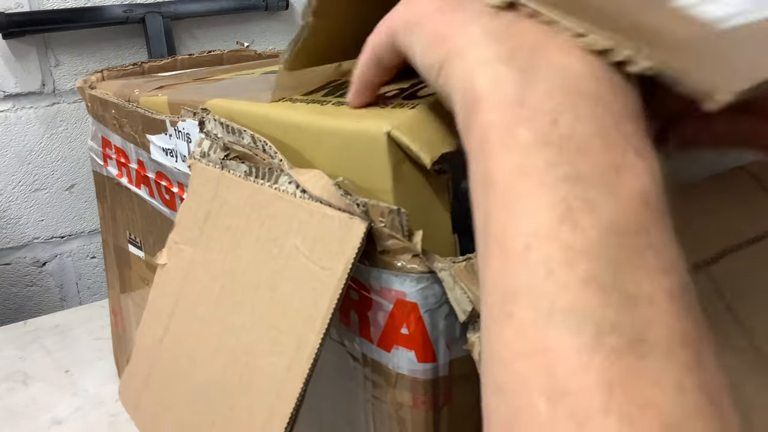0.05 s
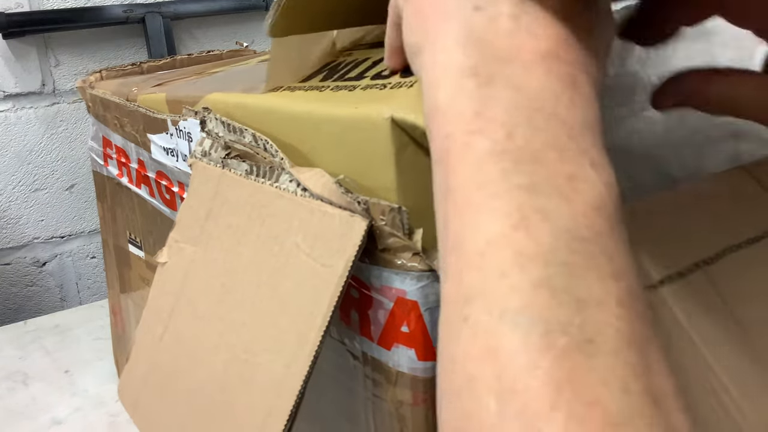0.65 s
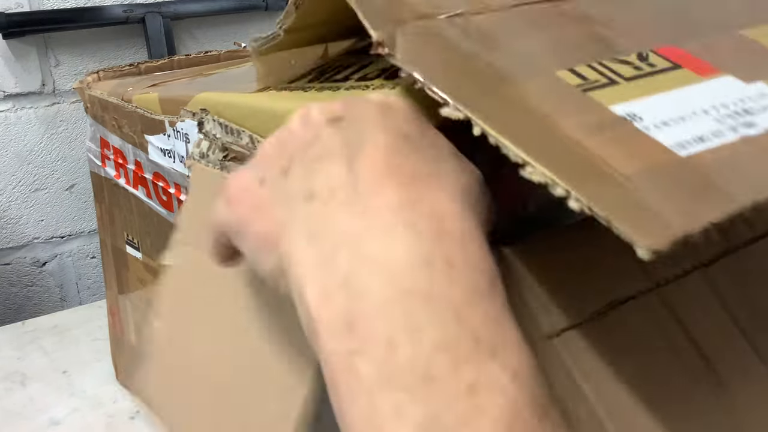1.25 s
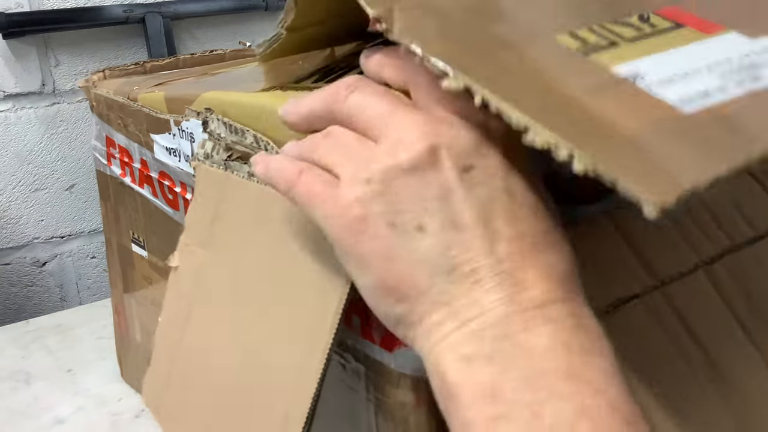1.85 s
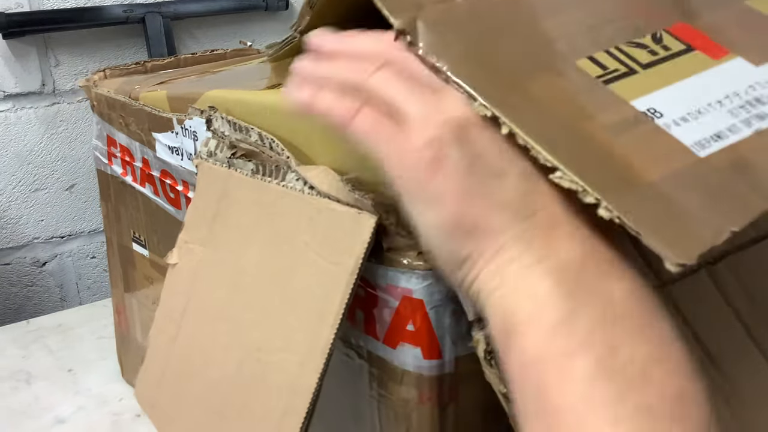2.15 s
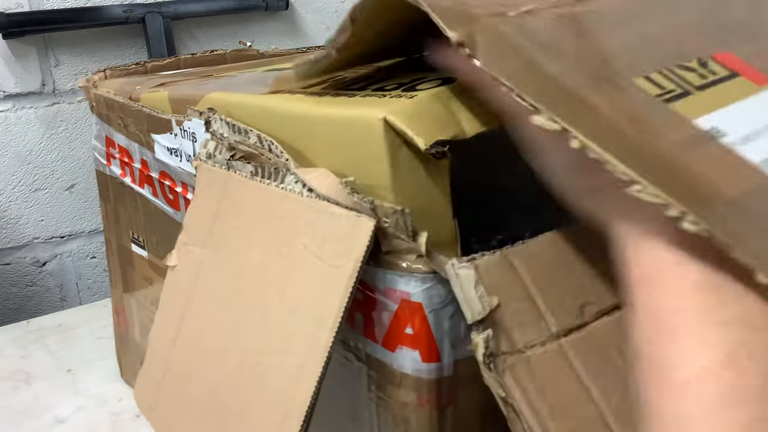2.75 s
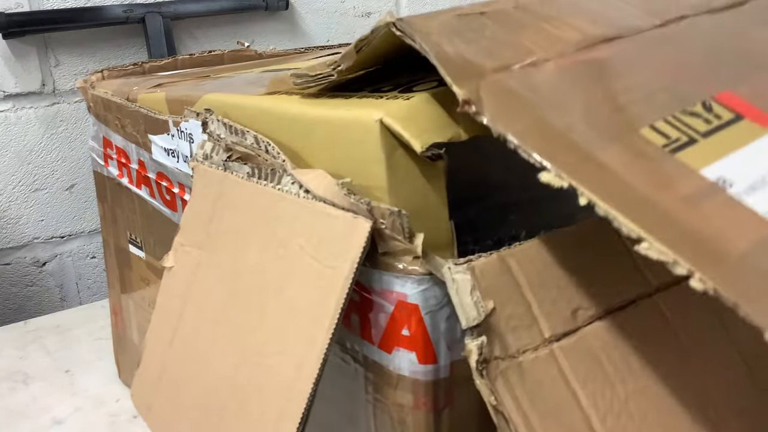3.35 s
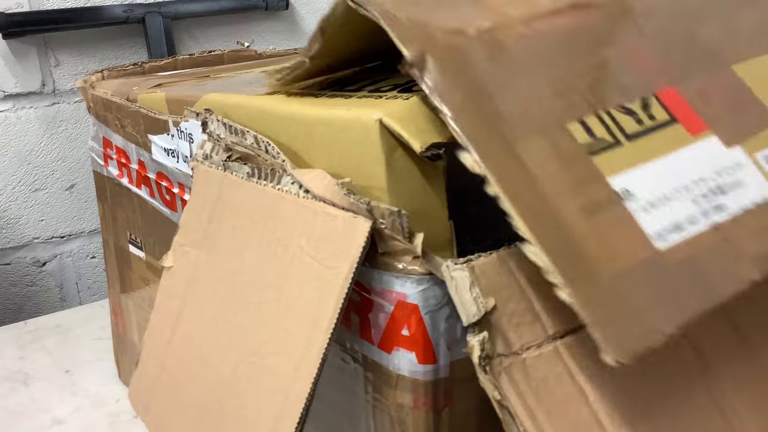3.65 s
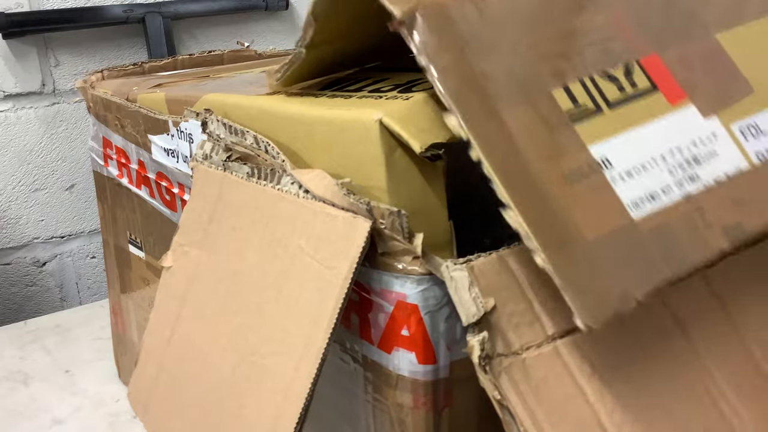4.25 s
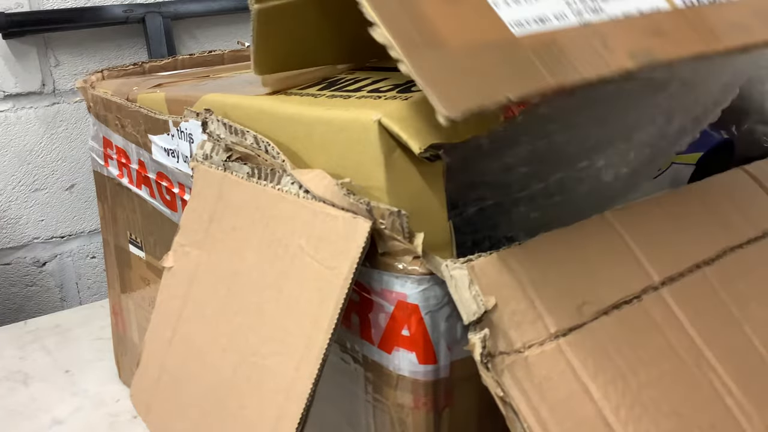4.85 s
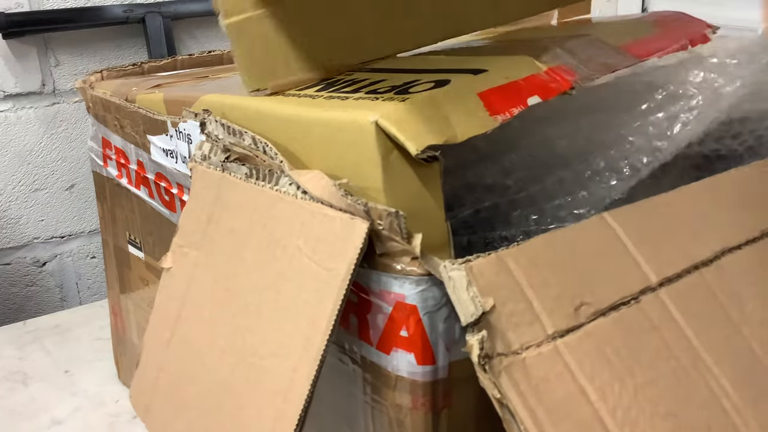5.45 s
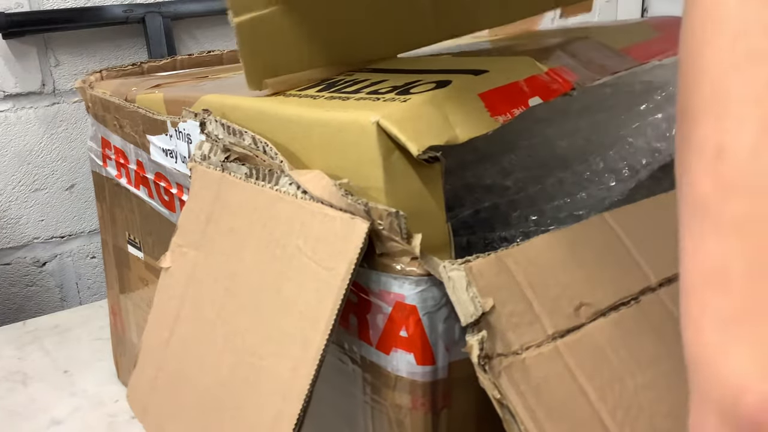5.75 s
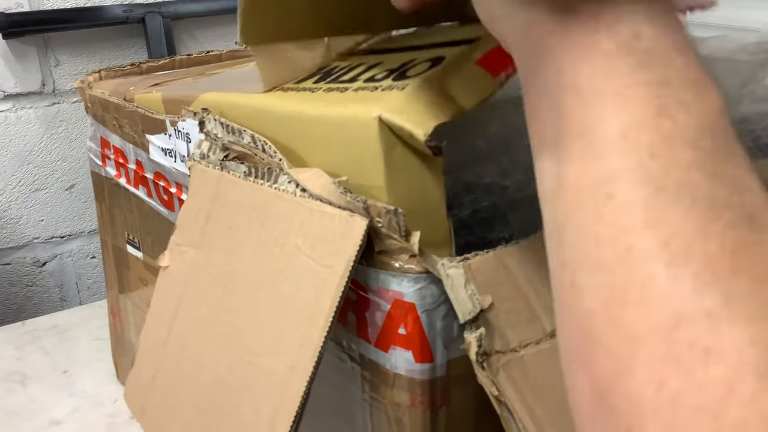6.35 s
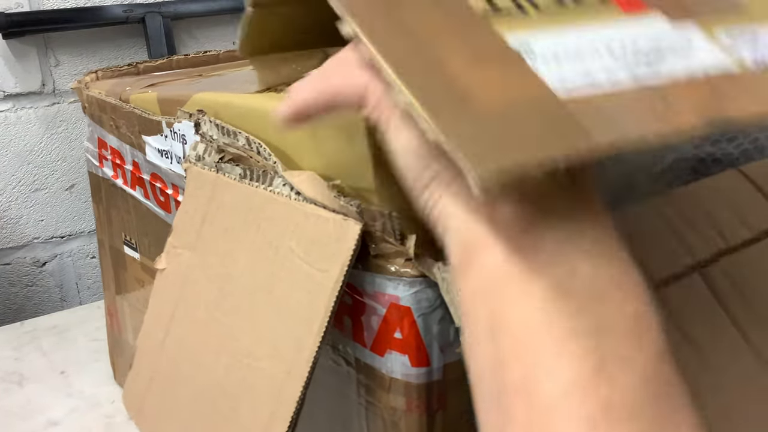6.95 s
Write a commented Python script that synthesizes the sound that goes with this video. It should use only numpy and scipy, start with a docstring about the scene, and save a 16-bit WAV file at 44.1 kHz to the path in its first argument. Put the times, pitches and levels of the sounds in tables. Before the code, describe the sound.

A sharp snap opens the sound, close by in a small room, as hands work on a big cardboard box. Bubble wrap rustles in uneven strokes with a fine, bright hiss and crinkle, while cardboard slides and bends with a soft, low rumble. Tape and creases snap near 1 second and again around 1.5 seconds. A hollow thud comes at 2 seconds, followed by smaller knocks and scraping until about 2.7 seconds. The handling turns quieter, then just before 4 seconds a flap briefly judders over an edge. A few clicks come near 5 seconds and the rustling swells. At about 5.5 seconds a flap tears free in a quick burst of cracks, the loudest moment, with another sharp snap just after. Rummaging continues with crinkles, short scrapes and snaps until about 7 seconds, over a faint, steady background rush.

```python
"""A sharp snap and a rustle of bubble wrap, close by in a small room: hands are opening a big cardboard box.
The wrap rustles as countless tiny creases buckle, board slides on board, and the panels bend and thud.
Tape and creases snap, and near 4 s a flap judders past an edge.
At about 5.5 s one flap tears free in a loud burst of cracks, then the rummaging goes on."""
import sys
import numpy as np
from scipy import signal
from scipy.io import wavfile

SR = 44100
rng = np.random.default_rng(int(sys.argv[2]) if len(sys.argv) > 2 else 0)


def wrap_up_sound(samples):
    """Save the sound to the file named by the first command line argument, as 16-bit audio."""
    columns = np.atleast_2d(samples).T
    # keep every value between -1 and 1, then stretch to whole-number steps
    tamed = np.clip(columns, -1, 1)
    steps = np.round(tamed * 32767).astype(np.int16)
    wavfile.write(sys.argv[1], SR, steps)


N = 313021
TIME = np.arange(N) / SR
FLEXING, RUBBING, RUSTLING = range(3)  # the three layers that the hands drive


# Tone of sliding plastic film: f/Hz, level/dB (levels in all tables are relative)
FILM_TONE = [(700, -31), (1800, -12), (3000, -13), (4800, -5), (5800, -2), (7200, -6), (8300, -8),
             (9800, -16), (12000, -18), (16000, -31)]

def bubble_wrap(hiss_db=-2, crinkle_db=-6, clump_db=2.08):
    """Film slides with a fine hiss; small creases buckle in clumps, the big low ones more softly."""
    sliding = grains(9000, 1.8) * gain_of(clump_db * wander(90))
    hiss = unit_rms(colour(sliding, FILM_TONE))
    clumps = gain_of(3.5 * wander(25))
    crinkle = np.zeros(N)
    for hz in np.geomspace(2000, 7200, 9):
        buckles = grains(50, 3.9) * clumps
        crinkle += np.sqrt(hz) * colour(buckles, hump(hz, 0.11, skirt_db=-14))
    return hand_effort(RUSTLING) * (gain_of(hiss_db) * hiss + gain_of(crinkle_db) * unit_rms(crinkle))


# Strokes of the hands: start t/s, length/s, flexing level/dB, rubbing level/dB, rustling level/dB
HAND_STROKES = [(-0.05, 0.097, -42.5, -42, -33), (0.07, 0.19, -52.5, -50, -45.5),
                (0.29, 0.13, -51.5, -50.5, -43.5), (0.48, 0.11, -48.5, -50.5, -42),
                (0.708, 0.049, -49.5, -51.5, -51.5), (0.815, 0.19, -48, -48.5, -43.5),
                (1.11, 0.19, -53.5, -52, -41.5), (1.291, 0.14, -50.5, -41.5, -42),
                (1.44, 0.24, -56.5, -45.5, -44.5), (1.699, 0.42, -50, -40.5, -43),
                (2.11, 0.21, -47, -45.5, -45), (2.288, 0.38, -45, -37.5, -39),
                (2.675, 0.16, -54, -51.5, -38), (2.857, 0.13, -50.5, -46.5, -45.5),
                (3.112, 0.49, -60.5, -54.5, -45), (3.343, 0.085, -56, -51.5, -54),
                (3.95, 0.17, -59, -53, -59), (4.243, 0.12, -56, -50, -48), (4.314, 0.17, -50, -43.5, -44.5),
                (4.583, 0.26, -56, -51, -44.5), (5.095, 0.18, -51.5, -49.5, -37.5),
                (5.286, 0.32, -53, -41.5, -36), (5.67, 0.062, -58, -66, -42),
                (5.911, 0.14, -57, -52, -40.5), (6.142, 0.07, -46.5, -50.5, -45),
                (6.3, 0.058, -55, -46, -41), (6.423, 0.12, -54.5, -52, -44),
                (6.577, 0.085, -58, -54, -45.5), (6.747, 0.29, -57.5, -50.5, -44.5),
                (7.038, 0.06, -57, -49, -40)]
# The faint stir that goes on between strokes: level/dB for flexing, rubbing, rustling
RESTING_DB = [-64, -56.5, -48]

def hand_effort(layer, attack_s=0.026, release_s=0.054, swell_db_per_s=4):
    """How hard the hands drive one layer: each stroke speeds up, presses a little harder, then fades."""
    power = np.full(N, gain_of(RESTING_DB[layer]) ** 2)
    for start, length, *levels_db in HAND_STROKES:
        t = np.arange(0, length + 10 * release_s, 1 / SR)
        shape = np.minimum(t / attack_s, 1) * np.exp(-np.maximum(t - length, 0) / release_s)
        stroke = shape * gain_of(levels_db[layer] + swell_db_per_s * (t - length / 2))
        add(power, start, stroke[start + t >= 0] ** 2)
    return np.sqrt(power)


# Creases, tape and film buckling: t/s, level/dB over 2 ms, centre f/Hz
BUCKLE_SNAPS = [(0.0035, -21, 5250), (0.1477, -29, 6350), (0.318, -28, 6230), (0.3881, -28, 5800),
                (0.5085, -33, 1300), (0.615, -29, 5270), (0.8353, -28, 4770), (0.9601, -18.5, 5450),
                (1.4834, -24, 5360), (1.5458, -23, 6000), (1.6229, -28.5, 5900), (2.0262, -30.5, 5900),
                (2.6813, -26, 3260), (4.8188, -30, 4060), (4.9469, -28.5, 6100), (5.0309, -35, 3400),
                (5.421, -21.5, 3650), (5.4404, -16, 5900), (5.4627, -21, 4600), (5.7073, -38, 5900),
                (5.7117, -16, 5600), (5.7178, -24.5, 5750), (5.9408, -35.5, 1600), (6.179, -31, 5100),
                (6.1855, -32, 2210), (6.1927, -29.5, 5700), (6.2237, -28.5, 5270), (6.2423, -35.5, 3000),
                (6.3636, -24.5, 5940), (6.439, -35, 2940), (6.6013, -31.5, 5800), (6.9324, -25.5, 6700),
                (7.0736, -26, 3240)]

def snaps(level_db=0.3, buckle_s=0.00031, tick_db=-10, samples=512):
    """A crease flips with a tick, then the patch around it chatters: longer if big, woody if low."""
    out, t = np.zeros(N), np.arange(samples) / SR
    for start, db, hz in BUCKLE_SNAPS + tearing_flap() + small_creases():
        size = 2 ** ((db + 30) / 20)
        chatter = rng.choice([-1, 1], samples) * t * np.exp(-t / (buckle_s * size))
        patch_tone = hump(hz, 0.24 * np.sqrt(6000 / hz), skirt_db=-12, dull_hz=3100)
        click = colour(chatter, patch_tone)
        click /= np.linalg.norm(click)
        click[0] += gain_of(tick_db) / size
        add(out, start, gain_of(db + level_db) * click * np.sqrt(0.002 * SR))
    return out


def tearing_flap(start_s=5.5225, gap_s=0.0105, gap_ratio=0.87, top_db=-12, fall_db_per_s=270, count=7):
    """Lists the snaps of a tear: ever faster, and loudest just before the last fibres part."""
    gaps = gap_s * gap_ratio ** np.arange(count - 1)
    times = start_s + np.append(0, np.cumsum(gaps))
    return [(t, top_db - fall_db_per_s * abs(t - times[-3]), 5900) for t in times]


def small_creases(over_db=4, spread_db=3, low_hz=1700, high_hz=6500, count=48):
    """Lists small snaps of random time and pitch, louder when the wrap is worked harder."""
    rustle_db = 20 * np.log10(hand_effort(RUSTLING))
    when, size, pitch = rng.random((count, 3)).T
    at = (when * N).astype(int)
    levels_db = rustle_db[at] + over_db + spread_db * (2 * size - 1)
    return list(zip(TIME[at], levels_db, low_hz * (high_hz / low_hz) ** pitch))


# Tone of board sliding on board: f/Hz, level/dB
RUB_TONE = [(120, -22), (280, -6), (480, -2.5), (620, 0.5), (800, -3), (1200, -5.5), (2000, -13),
            (16000, -43)]
# How much a raw edge rasps: t/s, level/dB compared with the flat face
EDGE_RASP = [(0, -1.5), (1.0, -24), (1.4, -5.5), (2.3, -6.5), (2.6, -3), (3.4, 5), (4.4, 0), (5.3, 4.5),
             (5.9, -9), (6.8, 1)]

def board_rubbing(catch_db=2, rasp_hz=2400):
    """Fibres catch and let go as board slides on board; a raw edge adds a coarser, brighter rasp."""
    catching = gain_of(catch_db * wander(70))
    face = unit_rms(colour(grains(3000, 4.1) * catching, RUB_TONE))
    edge = unit_rms(colour(grains(1200, 2.4) * catching, hump(rasp_hz, 0.88, skirt_db=-35)))
    edge_gain = gain_of(np.interp(TIME, *np.transpose(EDGE_RASP)))
    return hand_effort(RUBBING) * (face + edge_gain * edge)


# Tone of the bending panels: f/Hz, level/dB
PANEL_TONE = [(25, -13), (45, -11.5), (80, -2), (105, -9), (155, -4.5), (280, -4), (450, -12.5), (900, -47)]

def panel_rumble(uneven_db=1):
    """Uneven pushes make the big panels and the air in the box rumble."""
    pushes = grains(1500, 2.5) * gain_of(uneven_db * wander(35))
    return hand_effort(FLEXING) * unit_rms(colour(pushes, PANEL_TONE))


# Blows on the panels: t/s, level/dB, centre f/Hz, spread/octaves, decay time/s
PANEL_BLOWS = [(0.003, -36, 125, 0.5, 0.027), (0.961, -30, 226, 0.99, 0.012),
               (1.559, -30, 463, 0.98, 0.0051), (2.041, -18.5, 660, 0.8, 0.0042),
               (2.044, -18.5, 187, 0.75, 0.014), (2.082, -27.5, 256, 0.83, 0.019),
               (2.327, -26, 150, 0.53, 0.0083), (2.379, -23.5, 160, 0.84, 0.0075),
               (3.901, -27.5, 860, 0.34, 0.018), (5.421, -19.5, 1400, 0.95, 0.0059),
               (5.523, -21, 746, 1.15, 0.039), (5.555, -22.5, 710, 0.6, 0.0081),
               (5.568, -23, 152, 0.83, 0.022), (6.053, -34, 770, 0.36, 0.0065),
               (6.172, -38.5, 150, 0.84, 0.04), (6.93, -34, 410, 0.25, 0.013),
               (7.078, -32.5, 775, 0.25, 0.0077)]

def panel_thumps(level_db=-1):
    """A struck panel gives a dull thud that dies quickly."""
    return gain_of(level_db) * bursts(PANEL_BLOWS, per_s=3000, spread_db=4, rise_s=0.00028, skirt_db=-45)


# Quick slips of an edge or of tape: t/s, level/dB, centre f/Hz, spread/octaves, decay time/s
QUICK_SLIPS = [(0.385, -34.5, 2980, 1.2, 0.014), (0.836, -34.5, 5500, 0.47, 0.016),
               (0.961, -32.5, 4000, 0.8, 0.015), (3.432, -33, 1190, 0.79, 0.01),
               (3.894, -27.5, 3400, 0.72, 0.045), (4.781, -36.5, 1760, 0.31, 0.014),
               (4.817, -25, 3180, 1.0, 0.0092), (4.95, -30, 6900, 0.32, 0.053),
               (5.423, -25.5, 4250, 0.72, 0.02), (5.528, -21, 4500, 0.39, 0.018),
               (5.552, -11, 4470, 0.5, 0.0071), (5.568, -20.5, 6900, 0.4, 0.032),
               (6.34, -25.5, 2450, 0.77, 0.0098), (6.793, -33, 1970, 0.79, 0.015),
               (6.933, -23.5, 5450, 0.4, 0.0059), (7.074, -39, 3550, 0.63, 0.026)]

def edge_slips(level_db=-2):
    """An edge or a piece of tape slips with a short, bright scrape."""
    return gain_of(level_db) * bursts(QUICK_SLIPS, per_s=4000, spread_db=3.5, rise_s=0.0002, skirt_db=-15)


# The notes a flap rings with: f/Hz, level/dB, time to fade by 60 dB/s
FLAP_NOTES = [(272, -6, .11), (325, -7, .08), (362, 0, .19), (410, -4, .06), (1790, -2, .05),
              (2290, 0, .035)]

def flap_judder(start_s=3.894, level_db=-37.5, first_hz=425, last_hz=335, swell_s=0.0107, jitter=0.21):
    """A flap skids over the ridges of a cardboard edge, slowing down, and rings."""
    out, t = np.zeros(N), np.arange(SR // 4) / SR
    ridges_per_s = last_hz + (first_hz - last_hz) * np.exp(-t / (2 * swell_s))
    ridges_passed = np.cumsum(ridges_per_s * (1 + jitter * wander(393)[:len(t)])) / SR
    catches = np.diff(np.floor(ridges_passed), prepend=0) * t * np.exp(-t / swell_s)
    ring = sum(gain_of(db - 60 * t / fade_s) * np.sin(2 * np.pi * hz * t) for hz, db, fade_s in FLAP_NOTES)
    judder = signal.fftconvolve(catches, ring)[:len(t)]
    bass_cut = signal.butter(2, 200, "high", fs=SR, output="sos")  # the judder carries no deep bass
    add(out, start_s, gain_of(level_db) * unit_rms(signal.sosfilt(bass_cut, judder)))
    return out


# Pitches that the box and its air favour: f/Hz, width/Hz, boost/dB
BOX_RESONANCES = [(162, 16, 6), (218, 24, 2), (800, 220, 2.5)]

def hollow_box(x):
    """The box and the air inside ring along with the handling."""
    return boost(x, BOX_RESONANCES)


# How long the room rings: f/Hz, time to fade by 60 dB/s
ROOM_FADE = [(100, 0.66), (700, 0.18), (5000, 0.49), (13000, 0.65)]

def echoes(tail_db=-13, near_db=-7, near_s=0.018, gap_s=0.0022, samples=22050):
    """Quick echoes from flaps, table and wall, then the short tail of the room."""
    hz, frame_s, spectrum = signal.stft(rng.standard_normal(samples), SR, nperseg=256)
    fade = gain_of(-60 * frame_s / value_at(ROOM_FADE, hz)[:, None])
    tail = signal.istft(spectrum * fade, SR, nperseg=256)[1][:samples]
    t = np.arange(samples) / SR
    tail *= np.clip(t / gap_s - 1, 0, 1)
    near = grains(2500, 1.2, samples) * np.exp(-t / near_s) * (t > gap_s)
    return gain_of(tail_db) * tail / np.linalg.norm(tail) + gain_of(near_db) * near / np.linalg.norm(near)


def room(x, places=7, places_per_s=20):
    """The point of contact keeps moving, so the sound passes from one set of echoes to the next."""
    place, out = TIME * places_per_s, x
    for k in range(places):
        distance = abs((place - k + places / 2) % places - places / 2)
        share = np.sqrt(np.maximum(1 - distance, 0))
        out = out + signal.fftconvolve(x * share, echoes())[:N]
    return out


# Tone of the background: f/Hz, level/dB
BACKGROUND_TONE = [(20, -30), (60, -5), (500, -5), (2000, -14), (16000, -24)]

def background(level_db=-59):
    """A faint, steady, low rush of noise."""
    return gain_of(level_db) * colour(rng.standard_normal(N), BACKGROUND_TONE)


def bursts(rows, per_s, spread_db, rise_s, skirt_db, samples=11025):
    """Plays each row as a dying volley of small contacts on one patch of board."""
    out, t = np.zeros(N), np.arange(samples) / SR
    for start, db, hz, octaves, decay_s in rows:
        shape = (1 - np.exp(-t / rise_s)) * np.exp(-t / decay_s)
        contacts = grains(per_s, spread_db, samples) * shape
        sound = colour(contacts, hump(hz, octaves, skirt_db))
        add(out, start, gain_of(db) * sound * np.linalg.norm(shape) / np.linalg.norm(sound))
    return out


def grains(per_s, spread_db, samples=N):
    """Tiny clicks at random moments, most small and a few large."""
    happens = rng.random(samples) < per_s / SR
    size = np.minimum(rng.exponential(1, samples), 3)
    sign = rng.choice([-1, 1], samples)
    return unit_rms(happens * sign * gain_of(spread_db * size))


def wander(per_s):
    """A random drift that heads for a new value per_s times a second."""
    targets = rng.uniform(-1, 1, N // 32)
    return unit_rms(np.interp(TIME * per_s, np.arange(len(targets)), targets))


def hump(hz, octaves, skirt_db, dull_hz=7000, low_hz=200):
    """Tone of a patch that barely rings: one hump on a quiet, wide skirt that fades at both ends."""
    f = np.geomspace(20, SR / 2, 80)
    peak = np.exp(-0.5 * (np.log2(f / hz) / octaves) ** 2)
    skirt = gain_of(skirt_db) ** 2 / (1 + (f / dull_hz) ** 2) / (1 + (low_hz / f) ** 2)
    return np.column_stack([f, 10 * np.log10(peak + skirt)])


def colour(x, tone, size=4096):
    """Passes x through a body with the given tone (rows of f/Hz, level/dB)."""
    log_gain = np.log(gain_of(value_at(tone, abs(np.fft.fftfreq(size, 1 / SR)))))
    spectrum = np.exp(np.conj(signal.hilbert(log_gain)))  # rings only after it is hit
    ring = np.fft.ifft(spectrum).real[:size // 2]
    return signal.oaconvolve(x, ring / np.linalg.norm(ring))[:len(x)]


def boost(x, peaks):
    """Makes a few narrow bands of x louder."""
    for hz, width, db in peaks:
        x = x + (gain_of(db) - 1) * signal.lfilter(*signal.iirpeak(hz, hz / width, SR), x)
    return x


def value_at(table, hz):
    """Looks up a table between its rows, on a scale of octaves."""
    f, value = np.transpose(table)
    return np.interp(np.log(hz + 1), np.log(f), value)


def add(mix, start_s, sound):
    """Mixes a sound in at the given time."""
    part = mix[max(round(start_s * SR), 0):][:len(sound)]
    part += sound[:len(part)]


def gain_of(db):
    """Turns decibels into a multiplier."""
    return 10 ** (np.asarray(db) / 20)


def unit_rms(x):
    """Scales x to an average power of 1."""
    return x / np.sqrt(np.mean(x ** 2) + 1e-20)


def scene():
    """All the handling, coloured by the box and the room, over a faint background."""
    knocks = panel_thumps() + edge_slips()
    handling = panel_rumble() + board_rubbing() + bubble_wrap() + snaps() + knocks + flap_judder()
    return (room(hollow_box(handling)) + background())[None]


# Pitches at which the microphone's opening rings: f/Hz, width/Hz, boost/dB
MIC_RESONANCES = [(5650, 450, 2), (6090, 240, 3.5), (7080, 350, 2.5)]

def record(dry, trim_db=-1.5, low_hz=36, high_hz=15900):
    """The microphone rings in the treble and loses the deep bass and the very highest sounds."""
    bass_cut = signal.butter(4, low_hz, "high", fs=SR, output="sos")
    top_cut = signal.firwin(511, high_hz, window=("kaiser", 9), fs=SR)
    x = gain_of(trim_db) * signal.sosfilt(bass_cut, boost(dry, MIC_RESONANCES))
    return signal.oaconvolve(x, top_cut[None], "same")


dry = scene()
out = record(dry)
wrap_up_sound(out)
```